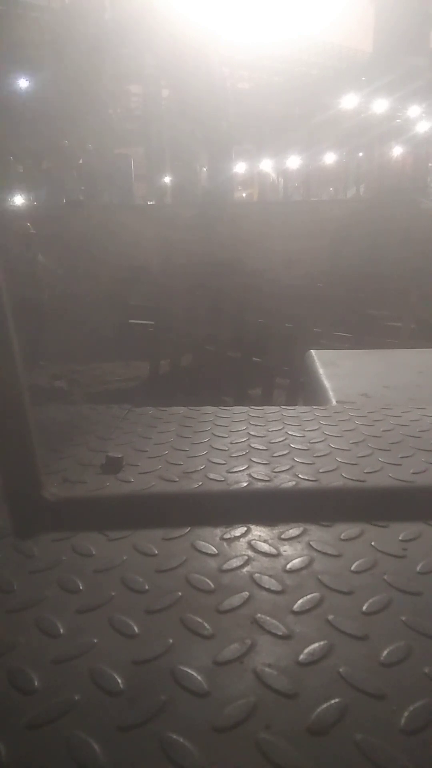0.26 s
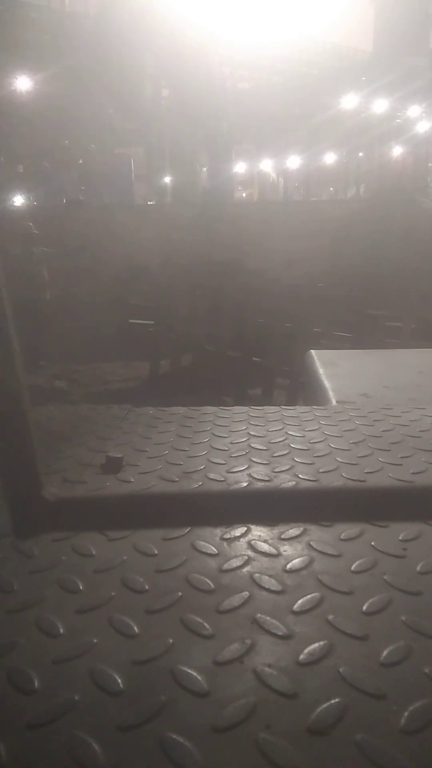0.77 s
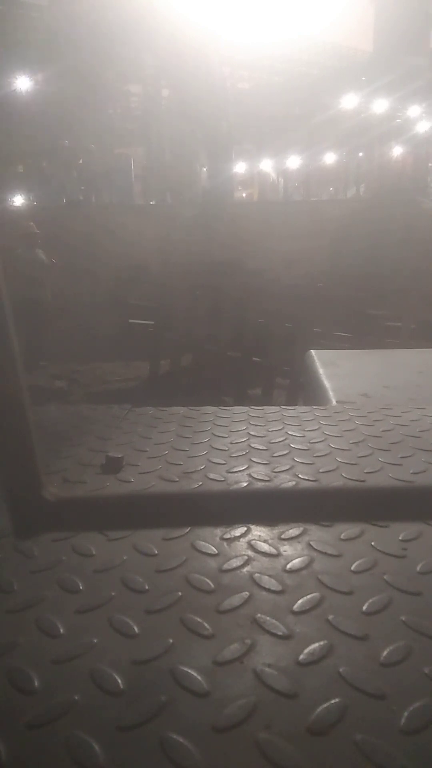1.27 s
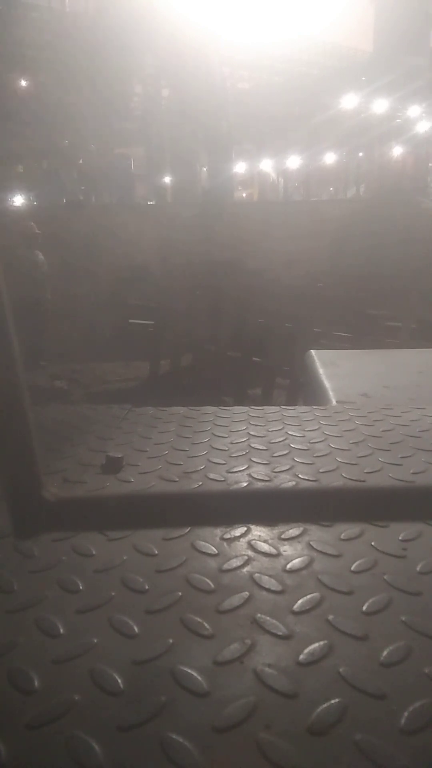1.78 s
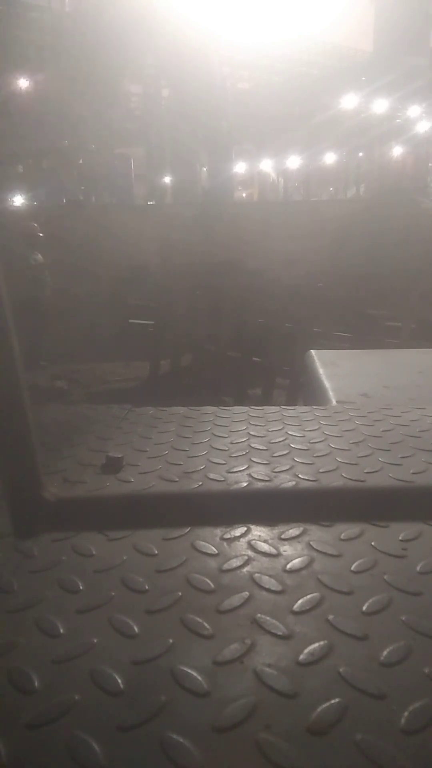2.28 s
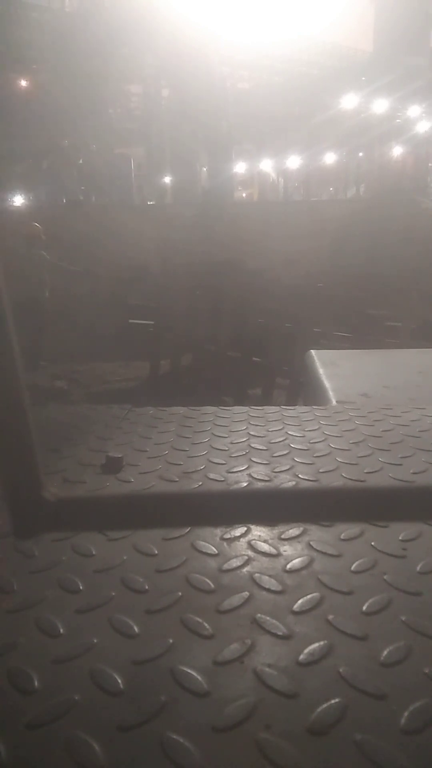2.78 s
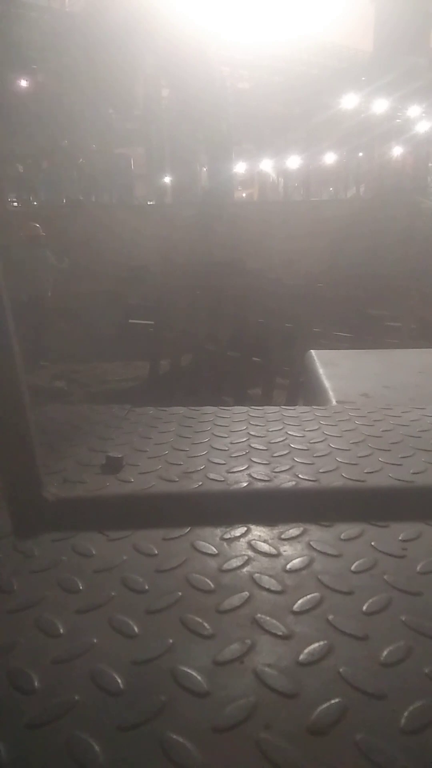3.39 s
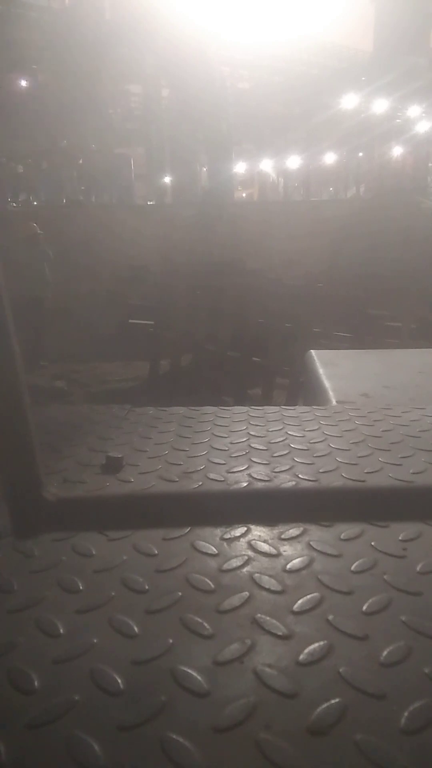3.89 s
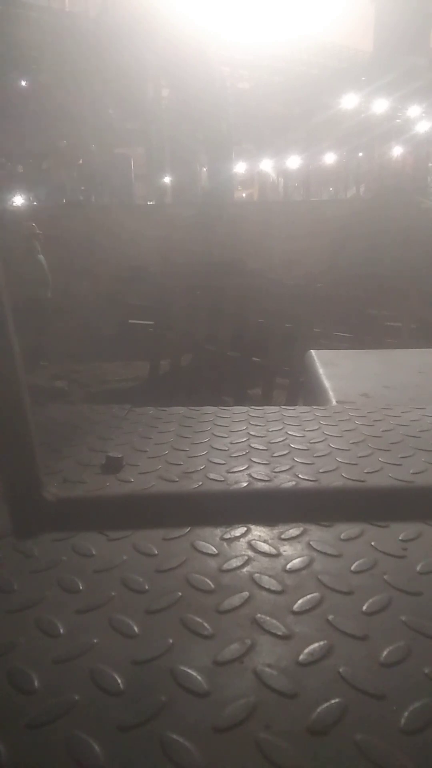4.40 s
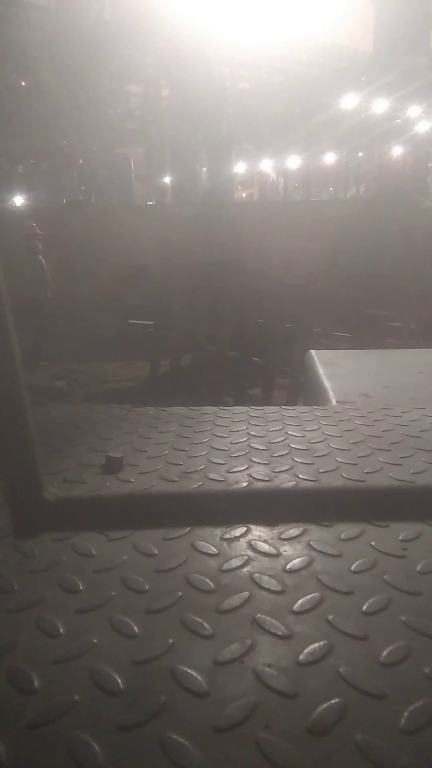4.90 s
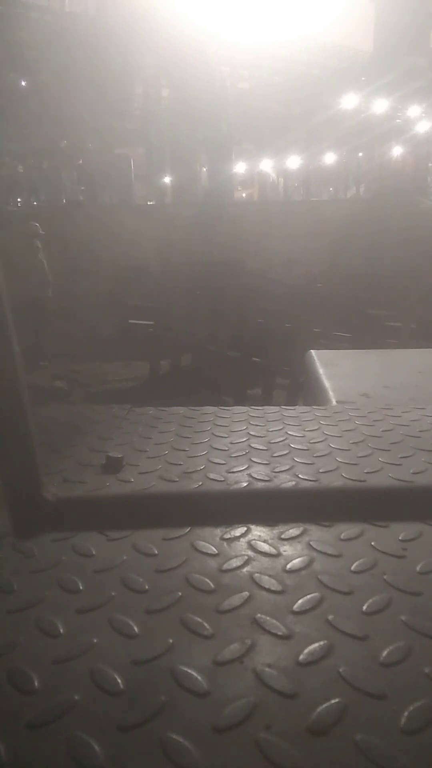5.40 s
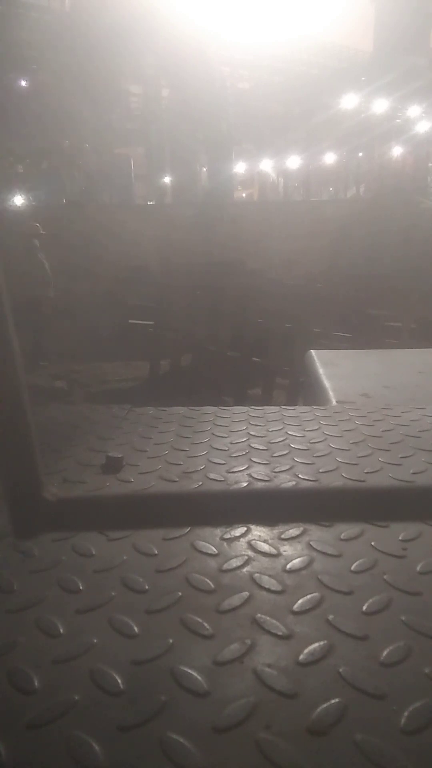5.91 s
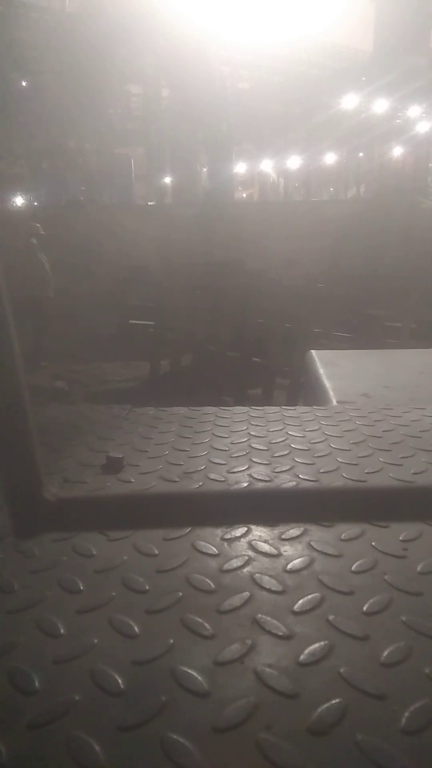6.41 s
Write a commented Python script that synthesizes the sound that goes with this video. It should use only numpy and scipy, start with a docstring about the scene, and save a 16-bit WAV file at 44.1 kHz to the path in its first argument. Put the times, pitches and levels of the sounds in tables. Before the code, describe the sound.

A large crane diesel drones continuously, heard close from its steel platform in an industrial yard at night. From 0 to 2.3 seconds it holds a low, nearly even hum around 50 Hz with stronger tones near 250 and 370 Hz, gently wavering, over soft clatter, airy cooling noise and very thin high singing. From about 2.3 a hydraulic valve opens: bright oil hiss rises by 2.9, with breathy whistles gliding downward. The engine sags slightly and staggers in pitch between 3 and 4.5, its boom and exhaust rasp growing clearly louder. Near 4.8 a sharper spurt and short whistles come; at about 5.05 the valve shuts and hiss drops away. The engine springs up with a brief boom flare, then settles quieter, its pitch swaying roughly every 0.4 seconds, with small uneven throbs and rattles. A faint dry metal tick lands at 6.6, just before the end.

```python
"""A crane's diesel engine drones at governed speed, heard from the machine's steel platform: tones at
multiples of the crank speed, with shaped noise for uneven combustion, exhaust and clatter.
A hydraulic valve opens: oil hisses and whistles as moving noise bands, and the engine sags and booms.
When the valve shuts, the governor hunts for a while and the idle oil flow sings thinly again.
Faint whines, cooling air, short deck echoes and a small metal tick surround it."""
import sys
import numpy as np
from scipy import signal
from scipy.fft import irfft, next_fast_len
from scipy.io import wavfile
from scipy.ndimage import uniform_filter1d

SR = 44100
rng = np.random.default_rng(int(sys.argv[2]) if len(sys.argv) > 2 else 0)


def store_pcm(level_fs):
    """Save levels as 16-bit WAV."""
    pcm = np.round(np.clip(level_fs, -1, 1) * 32767).astype(np.int16)
    wavfile.write(sys.argv[1], SR, np.atleast_2d(pcm).T)


N = 293260

# crankshaft speed before hunting; it sags and staggers while the engine pulls:
# (time [s], speed [turns/s])
SPEED = [(0, 24.5), (0.08, 24.78), (0.22, 24.55), (0.6, 24.52), (0.9, 24.42), (1.6, 24.48), (2.35, 24.45),
         (2.7, 24.2), (3.08, 23.5), (3.38, 24.4), (3.76, 23.2), (3.96, 24.25), (4.17, 23.45), (4.4, 23.8),
         (4.6, 23.58), (4.95, 23.8), (5.07, 24.7), (5.3, 24.22), (6.65, 24.35)]
# the governor hunts, gently before the load and hard after it:
# (start [s], length [s], period [s], swing [turns/s])
HUNTS = [(0.95, 1.8, .328, .24), (5.005, 1.64, .412, .66)]
HUNT_DECAY_S = 4.04
# engine load: (time [s], share [0-1])
LOAD = [(2.5, 0.35), (2.76, 0.43), (2.88, 0.67), (3.05, 0.77), (3.5, 0.89), (4.2, 0.96), (4.82, 0.97),
        (5.03, 0.34), (5.27, 0.28)]
FUEL_LEAD_S = 0.011
# how unevenly the engine fires; each layer follows it by its own amount: (time [s], unevenness [relative dB])
UNEVEN = [(0, -0.86), (1.2, -0.5), (2.3, -0.5), (4.3, 0.5), (5.25, -0.1), (5.65, 1.3), (5.95, 1),
          (6.65, 1.2)]

# strong engine tones, each loudest at one pitch, where the bodywork answers best; first row running free,
# second under load:
# (multiple of crank speed, level at best [dB], best pitch [Hz], half width [Hz], flutter [share])
THROB = [(2, -33.5, 50.97, 1.17, 0.36), (2, -26, 47.9, 2, 0.087)]
BOOM = [(10, -34.5, 252.3, 2.86, 0.4), (10, -19.5, 234.5, 4, 0.069)]
HUM = [(15, -30.3, 373, 4.0, 0.09), (15, -28, 358, 8, 0.07)]
OVERTONE = [(20, -46, 495, 8.6, 0.25), (20, -46.5, 482, 12, 0.13)]
FLUTTER_HZ = 9.9
THROB_LAG_S = 0.11   # the firing throb follows the load a little late
THROB_SURGE_DB = 0.2   # dB per turn/s gained in a second
HUM_UNEVEN, OVERTONE_UNEVEN, BOOM_UNEVEN = -0.83, 3.3, 2.06   # dB per dB of unevenness
# the boom flares once more as the freed engine overshoots: (middle [s], spread [s], added level [dB])
BOOM_FLARE = (5.125, 0.06, 8)
HUM_DUCK_DB = 5   # the hum gives way while the boom flares
# weaker engine tones: (multiple of crank speed, level running free [dB], level under load [dB])
ORDERS = [(1, -46, -43), (3, -54, -54), (5, -37, -43), (7, -56, -52), (8, -55.5, -37.5), (9, -45, -39),
          (10.5, -62, -42), (12, -44, -43), (12.5, -60, -42), (13, -50, -52), (13.5, -65, -46),
          (14, -55, -47), (16, -68, -47), (17, -55, -54), (18, -55, -48), (23, -66, -49.5), (25, -62, -52),
          (30, -66, -64)]
PORT_LAG_S = 0.00014
SHARED_BASS_HZ = 120   # below this the lag between the ports shrinks

# bodywork resonances shaken by uneven combustion:
# (pitch [Hz], width [Hz], level running free [dB], level under load [dB])
BODY = [(29, 20, -47.5, -46.5), (52, 30, -44, -43), (98, 24, -54, -54), (133, 18, -42.3, -41.7),
        (178, 70, -51, -44.7), (243, 40, -50, -40), (292, 16, -47.5, -38.5), (330, 36, -47.5, -42),
        (374, 26, -54, -40), (420, 34, -51, -45), (492, 50, -51.8, -49.3), (552, 60, -55.3, -54.5)]
# rasp of the exhaust: (frequency [Hz], spectrum [relative dB per Hz])
GROWL = [(520, -10.5), (620, 1.5), (740, -5), (840, -18), (1000, -17), (1400, -53), (3000, -100)]
GROWL_FREE_DB, GROWL_LOADED_DB = -56, -50
# injector and gear clatter: (frequency [Hz], spectrum [relative dB per Hz])
CLATTER = [(410, -17.5), (700, -0.5), (1170, -6), (1450, -7), (1770, -5.5), (3800, -15.5), (4940, -55),
           (8360, -120)]
CLATTER_FREE_DB, CLATTER_LOADED_DB = -49.5, -45
# extra fuel lifts these layers while the engine speeds up: dB per turn/s gained in a second
GROWL_SURGE_DB, CLATTER_SURGE_DB, UNEVEN_SURGE_DB = 0.51, 0.1567, 0.01
# brief swells of engine tones, bodywork and clatter; narrow ones ring, wide ones rattle:
# (middle [s], spread [s], pitch [Hz], width [Hz], peak level [dB])
SWELLS = [(1.34, .08, 246, 8, -34), (2.63, .025, 1800, 2600, -48), (2.69, .05, 760, 24, -49),
          (3.15, .1, 1800, 2600, -50), (3.19, .04, 240, 12, -29), (3.9, .1, 850, 130, -54),
          (3.92, .04, 490, 40, -43), (4.31, .04, 133, 16, -33), (4.45, .06, 550, 140, -42),
          (4.73, .05, 800, 90, -47), (6.02, .06, 134, 16, -34), (5.57, .05, 248, 10, -35),
          (6.14, .035, 234, 14, -34), (6.24, .035, 128, 16, -32), (6.25, .035, 48, 12, -32),
          (6.25, .07, 1800, 2600, -51), (6.43, .045, 492, 20, -41)]

# oil rushing through the valve: (frequency [Hz], spectrum [relative dB per Hz])
OIL = [(3000, -9), (5800, 2), (6500, 2), (7500, 8), (9100, 7.5), (9900, 4.5), (11000, 3), (12700, -1),
       (14200, -7)]
OIL_OPEN_DB = -50.5
VALVE_OPEN_S, OPEN_TRAVEL_S = 2.33, 0.52
VALVE_SHUT_S, SPOOL_TRAVEL_S = 5.05, 0.18
# short spurts of oil, the strongest just before the valve shuts:
# (start [s], attack [s], decay [s], level [dB])
SPURTS = [(0.4, 0.064, 0.095, -54), (4.815, 0.035, 0.06, -46.5), (5.79, .04, 0.063, -56)]
# oil rasps in the valve: faint leaks while shut, longer rasps as it opens and closes:
# (start [s], length [s], level [dB])
THROTTLING = [(0.13, .37, -56.5), (1.418, .48, -58), (2.454, .68, -55), (4.47, 0.63, -55.5),
              (4.93, 0.073, -59.5)]
THROTTLE_HZ, THROTTLE_WIDTH_HZ, THROTTLE_EDGE_S = 4500, 4700, 0.03
# the valve whistles as it opens, holds and shuts, each time gliding to rest:
# (start [s], length [s], middle of glide [s], start [Hz], end [Hz], width [Hz], level setting [relative dB])
WHISTLES = [(2.58, .28, 2.7, 10900, 10300, 1500, -59), (2.62, .6, 2.76, 9900, 7300, 1500, -53.5),
            (2.8, .85, 2.78, 7300, 6550, 550, -57), (2.7, 2.15, 4.4, 9280, 9150, 300, -59),
            (3.2, 1.62, 3.9, 8800, 8650, 700, -58), (3.4, .65, 3.8, 10900, 10300, 1400, -61),
            (4.72, .26, 4.75, 8500, 7650, 600, -54), (4.85, .08, 4.8, 6900, 6500, 700, -51),
            (4.94, .11, 4.88, 6650, 6400, 380, -49)]
WHISTLE_GLIDE_S, WHISTLE_RAGGED_DB, WHISTLE_RAGGED_HZ = .09, -1.5, 16
# thin singing of the idle oil flow, which sets in early and fades while the valve is open
BYPASS_SHUT_DB, BYPASS_OPEN_DB, BYPASS_START_S = -58.5, -65, .15
# faint whines of the pump and its pipes: (pitch [Hz], level running free [dB], level under load [dB])
WHINES = [(1590, -74, -67), (1733, -66, -63), (4080, -70, -73), (4230, -73, -74), (13611, -72, -86),
          (13749, -63, -90)]
# small tick of metal: (time [s], peak [dB])
TICKS = [(6.6075, -31)]
# cooling air: (frequency [Hz], spectrum [relative dB per Hz])
AIR = [(2000, -3.5), (3500, -14), (4300, -0.5), (5500, -2), (7200, -1), (7800, 2), (8400, -1), (9200, -3),
       (10000, -7.5), (11000, -11), (14000, -16)]

# stereo balance: (frequency [Hz], left minus right [dB])
BALANCE_DB = [(150, 0), (290, .8), (370, 3.2), (430, 3.3), (520, 6.3), (660, 8), (950, -1.3), (1800, -3.4),
              (3100, -1.3), (4200, -9), (5600, -16), (7800, -14.3), (9800, -5.8), (12000, -9)]
# stereo likeness of noise: (frequency [Hz], left-right likeness [-1 to 1])
LIKENESS = [(45, 1), (130, .992), (250, .97), (400, .86), (560, .2), (900, -.3), (2000, 0), (9000, 0),
            (13500, -.25)]
CUTOFF_HZ = 14200


def crank_speed():
    """The governor overshoots and swings about its speed, each swing a little smaller than the last."""
    speed = in_time(SPEED)
    for start, length, period, swing in HUNTS:
        age = length * progress(start, length)
        speed = speed + swing * np.exp(-age / HUNT_DECAY_S) * np.sin(2 * np.pi * age / period)
    return speed


def drone(crank, speed, load, surge):
    """Four strong tones lead, over weaker multiples of the crank speed that load reshapes."""
    weak = sum(engine_tone(crank, order, blend(load, free_db, loaded_db), flutter=0.11, flutter_hz=4.9)
               for order, free_db, loaded_db in ORDERS)
    late_load = in_time([(s + THROB_LAG_S, share) for s, share in LOAD])
    heavy_load = np.clip(load, 0, 1) ** 3   # only heavy load shifts the hum
    flare_s, flare_spread, flare_db = BOOM_FLARE
    uneven_db, flare = in_time(UNEVEN), bell(flare_s, flare_spread)

    throb = strong_tone(crank, speed, late_load, THROB) * from_db(THROB_SURGE_DB * surge)
    boom = strong_tone(crank, speed, load, BOOM) * from_db(BOOM_UNEVEN * uneven_db + flare_db * flare)
    hum = strong_tone(crank, speed, heavy_load, HUM) * from_db(HUM_UNEVEN * uneven_db - HUM_DUCK_DB * flare)
    overtone = strong_tone(crank, speed, load, OVERTONE) * from_db(OVERTONE_UNEVEN * uneven_db)
    return weak + throb + boom + hum + overtone


def strong_tone(crank, speed, load, tone):
    """A leading tone swells and fades with the speed; load changes its strength and steadiness."""
    (order, *free, free_flutter), (_, *loaded, loaded_flutter) = tone
    hz = order * speed
    level_db = blend(load, answer_db(hz, *free), answer_db(hz, *loaded))
    return engine_tone(crank, order, level_db, blend(load, free_flutter, loaded_flutter), FLUTTER_HZ)


def answer_db(hz, top_db, best_hz, half_width_hz):
    """Level of a tone as it slides across a resonance."""
    return top_db - 10 * np.log10(1 + ((hz - best_hz) / half_width_hz) ** 2)


def engine_tone(crank, order, level_db, flutter, flutter_hz):
    """A multiple of the crank rotation, trembling in strength and timing, a little later at the left port."""
    hz = order * np.mean(np.array(SPEED)[:, 1])
    tremble = 1 + flutter * (drift(flutter_hz) + 1j * drift(flutter_hz))
    path_phase = rng.uniform(0, 2 * np.pi)   # each tone comes its own way through the bodywork
    tone = np.sqrt(2) * from_db(level_db) * tremble * np.exp(1j * (order * crank + path_phase))
    lag_s = PORT_LAG_S * min(hz / SHARED_BASS_HZ, 1) ** 2 * np.array([[1], [0]])   # left, right
    return np.real(tone * np.exp(-2j * np.pi * hz * lag_s) * ports(hz))


def rumble(load, surge):
    """No two firings are equal: their scatter, as noise, rings in the bodywork resonances."""
    rings = sum(from_db(blend(load, free_db, loaded_db)) * resonant(hz, width)
                for hz, width, free_db, loaded_db in BODY)
    return from_db(in_time(UNEVEN) + UNEVEN_SURGE_DB * surge) * rings


def growl(load, surge):
    """The exhaust rasps under load and barks as the governor adds fuel, more so when firing is uneven."""
    level_db = blend(load, GROWL_FREE_DB, GROWL_LOADED_DB) + GROWL_SURGE_DB * surge
    return from_db(level_db + in_time(UNEVEN) / 2) * hiss(GROWL)


def clatter(load, surge):
    """Mechanical noise of injectors and gears, louder under load and as the engine speeds up."""
    level_db = blend(load, CLATTER_FREE_DB, CLATTER_LOADED_DB) + CLATTER_SURGE_DB * surge
    return from_db(level_db) * hiss(CLATTER)


def pulsing(crank):
    """Beats of the two-turn engine cycle, with two firings and five pump strokes a turn."""
    return 1 + .06 * np.cos(crank / 2) + .07 * np.cos(2 * crank) + .14 * np.cos(5 * crank)


def swells():
    """Engine tones, bodywork and clatter swell briefly at set moments: resonant noise under a smooth bell."""
    return sum(from_db(level_db) * bell(s, spread) * resonant(hz, width)
               for s, spread, hz, width, level_db in SWELLS)


def hydraulics():
    """Oil hisses, whistles and rasps in the valve, and sings in the bypass while the valve is shut."""
    opening = progress(VALVE_OPEN_S, OPEN_TRAVEL_S) - progress(VALVE_SHUT_S, SPOOL_TRAVEL_S)
    spurts = sum(from_db(level_db) * spurt(*timing) for *timing, level_db in SPURTS)
    flow = from_db(OIL_OPEN_DB) * opening + spurts
    throttled = sum(from_db(level_db)
                    * (progress(s, THROTTLE_EDGE_S) - progress(s + length, THROTTLE_EDGE_S))
                    for s, length, level_db in THROTTLING)
    rasp = throttled * resonant(THROTTLE_HZ, THROTTLE_WIDTH_HZ)
    bypassed = progress(BYPASS_START_S, SPOOL_TRAVEL_S) * (1 - opening)
    singing = from_db(blend(bypassed, BYPASS_OPEN_DB, BYPASS_SHUT_DB)) * resonant(13730, 800)
    return flow * hiss(OIL) + rasp + whistles() + singing


def spurt(start_s, attack_s, decay_s):
    """A quick rise, then a dying away."""
    since_top = np.maximum(np.arange(N) / SR - start_s - attack_s, 0)
    return progress(start_s, attack_s) * np.exp(-since_top / decay_s)


def whistles():
    """A band of noise at the valve's edge rises, glides down to rest and fades."""
    out = 0
    for start, length, glide_s, start_hz, end_hz, width_hz, level_db in WHISTLES:
        lowpass = signal.butter(4, width_hz / 2, fs=SR, output="sos")
        band = rms_one(signal.sosfilt(lowpass, rng.standard_normal((2, N))))
        glide = .5 + .5 * np.tanh((np.arange(N) / SR - glide_s) / WHISTLE_GLIDE_S)
        hz = blend(glide, start_hz, end_hz)
        carrier = np.cos(2 * np.pi * np.cumsum(hz) / SR)   # lifts the low band up to the whistle's pitch
        ragged_db = WHISTLE_RAGGED_DB * drift(WHISTLE_RAGGED_HZ)
        envelope = np.sqrt(np.abs(np.sin(np.pi * progress(start, length))))
        out = out + 2 * from_db(level_db + ragged_db) * envelope * band * carrier * ports(hz)
    return out


def whines(load, waver_hz):
    """Thin tones whose strength and phase wander; load shifts the weight between them."""
    t = np.arange(N) / SR
    out = 0
    for hz, free_db, loaded_db in WHINES:
        wander = drift(waver_hz) + 1j * drift(waver_hz)
        tone = np.real(wander * np.exp(2j * np.pi * hz * t))
        out = out + from_db(blend(load, free_db, loaded_db)) * ports(hz) * tone
    return out


def ticks(low_hz, high_hz):
    """A tiny dry contact, all treble: a single-sample click through a band filter."""
    clicks = np.zeros(N)
    for s, peak_db in TICKS:
        clicks[int(s * SR)] = from_db(peak_db)
    band = signal.butter(2, [low_hz, min(high_hz, .45 * SR)], "band", fs=SR, output="sos")
    passed_share = 2 * (high_hz - low_hz) / SR   # of the click's height
    return signal.sosfilt(band, clicks + 1e-18) / passed_share * ports(high_hz)


def cooling_air():
    """Moving air as steady broad noise."""
    return from_db(-51.0) * hiss(AIR)


def platform(x, count):
    """Short echoes from deck plates and walls, different at each port, ripple the spectrum."""
    strength = .075
    out = x.copy()
    for channel in range(2):
        for lag in (rng.uniform(.003, .025, count) * SR).astype(int):
            out[channel, lag:] += strength * x[channel, :-lag]
    return out / np.sqrt(1 + count * strength ** 2)


def hiss(spectrum):
    """Broad noise that falls away below its lowest point."""
    return noise(lambda hz: from_db(at_hz(spectrum, hz)) * np.minimum(hz / spectrum[0][0], 1) ** 2)


def resonant(centre_hz, width_hz):
    """Noise passed twice through one resonance."""
    def colour(hz):
        damping = (hz * width_hz) ** 2
        return damping / (damping + (hz ** 2 - centre_hz ** 2) ** 2)
    return noise(colour)


def noise(colour):
    """Stereo noise with gain colour(Hz), levelled to unit mono spread; the ports share bass more than treble."""
    size = next_fast_len(N, True)
    hz = np.fft.rfftfreq(size, 1 / SR)
    mid, side = rng.standard_normal((2, len(hz))) + 1j * rng.standard_normal((2, len(hz)))
    alike = np.clip(at_hz(LIKENESS, hz), -1, 1)
    pair = np.sqrt(1 + alike) * mid + np.sqrt(1 - alike) * side * [[1], [-1]]
    out = irfft(pair * ports(hz) * colour(hz), size)[:, :N]
    return out / np.std(out.mean(axis=0))


def ports(hz):
    """Left and right gain of the two microphone ports at these frequencies."""
    pair = from_db(at_hz(BALANCE_DB, hz) * np.array([[.5], [-.5]]))
    return pair / np.sqrt(np.mean(pair ** 2, axis=0))


def drift(rate):
    """Slow chance of rms 1 that changes about rate times a second."""
    r = np.exp(-80 * np.pi * rate / SR)   # drawn at every 40th sample
    slow = signal.lfilter([1], [1, -2 * r, r * r], rng.standard_normal(N // 40 + 2002))[2000:]
    return np.interp(np.arange(N) / 40, np.arange(len(slow)), rms_one(slow))


def bell(s, spread_s):
    """A smooth rise and fall around a moment."""
    return np.exp(-.5 * ((np.arange(N) / SR - s) / spread_s) ** 2)


def progress(start_s, length_s):
    """A ramp from 0 to 1 over this stretch of time."""
    return np.clip((np.arange(N) / SR - start_s) / length_s, 0, 1)


def blend(share, start, end):
    """Go from start to end as share goes from 0 to 1."""
    return start + share * (end - start)


def in_time(rows):
    """A curve of (time [s], value) rows at every sample."""
    return np.interp(np.arange(N) / SR, *np.transpose(rows))


def at_hz(points, hz):
    """Read (frequency [Hz], value) points on a log-frequency axis."""
    freqs, values = np.transpose(points)
    return np.interp(np.log(hz + 1e-3), np.log(freqs), values)


def from_db(db):
    """Decibels to gain."""
    return 10 ** (np.asarray(db) / 20)


def rms_one(x):
    """Scale to unit rms."""
    return x / np.sqrt(np.mean(x ** 2) + 1e-20)


def scene():
    """Crank speed and load drive the engine; air and oil flow around it."""
    speed, load = crank_speed(), in_time(LOAD)
    crank = 2 * np.pi * np.cumsum(speed) / SR   # angle [rad]
    surge = uniform_filter1d(np.gradient(speed) * SR, size=SR // 20)   # turns/s gained in a second
    # the fuel comes just before the speed
    surge = np.interp(np.arange(N) + FUEL_LEAD_S * SR, np.arange(N), surge)

    lope = 1 + 0.15 * np.cos(crank / 2)   # one cylinder fires a little harder than the rest
    engine = drone(crank, speed, load, surge) + lope * rumble(load, surge)
    exhaust = pulsing(crank) * growl(load, surge)
    # clatter and flow each flicker slightly in level
    gears = clatter(load, surge) * pulsing(crank) * from_db(0.92 * drift(35))
    flow = (cooling_air() + hydraulics()) * from_db(0.41 * drift(24))
    echoed = platform(gears + flow, count=20)
    small_sounds = whines(load, waver_hz=15) + ticks(low_hz=7240, high_hz=10900)
    return engine + exhaust + swells() + echoed + small_sounds


def record(dry):
    """The microphone drops the deepest bass, and the top is cut steeply."""
    thin = signal.sosfilt(signal.butter(1, 14, "high", fs=SR, output="sos"), dry)
    return signal.sosfilt(signal.ellip(12, .1, 80, CUTOFF_HZ, fs=SR, output="sos"), thin)


dry = scene()
out = record(dry)
store_pcm(out)
```